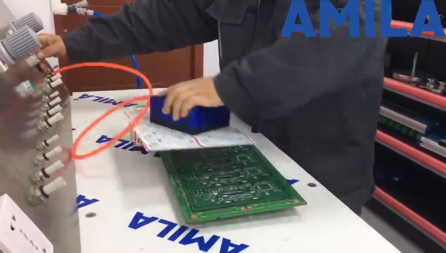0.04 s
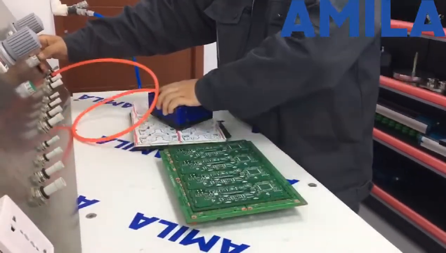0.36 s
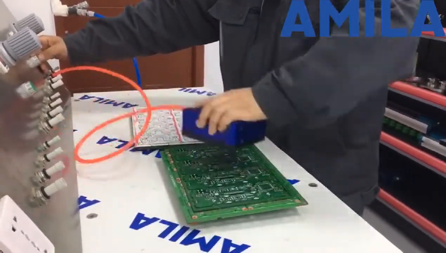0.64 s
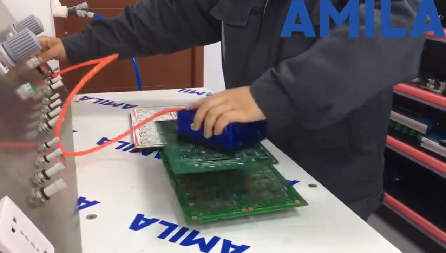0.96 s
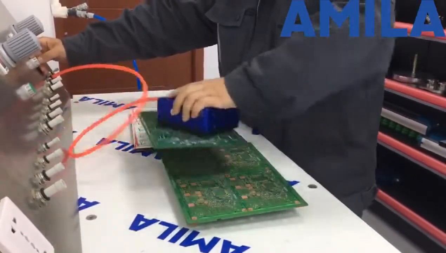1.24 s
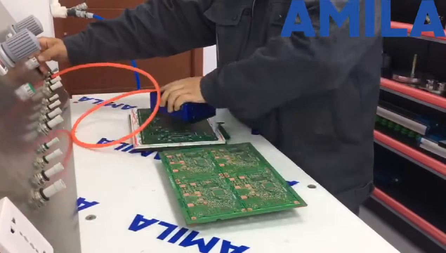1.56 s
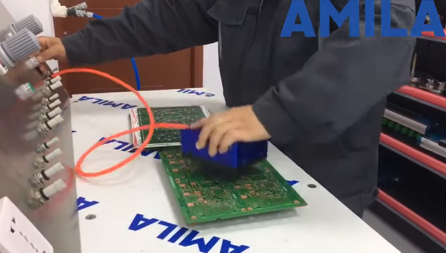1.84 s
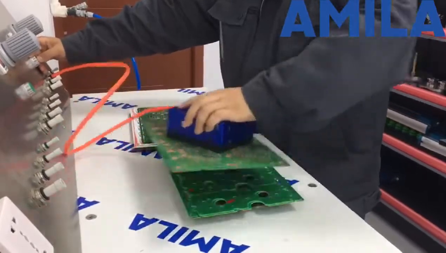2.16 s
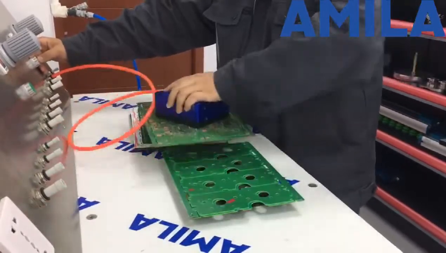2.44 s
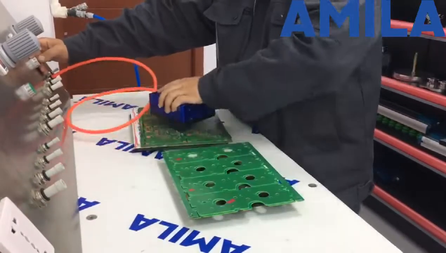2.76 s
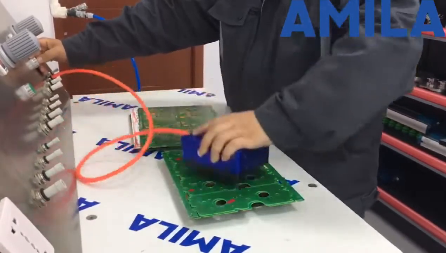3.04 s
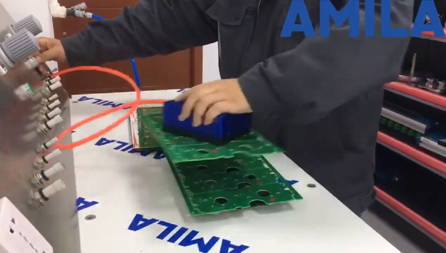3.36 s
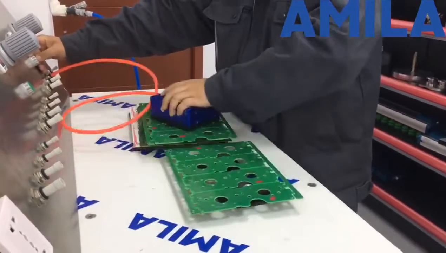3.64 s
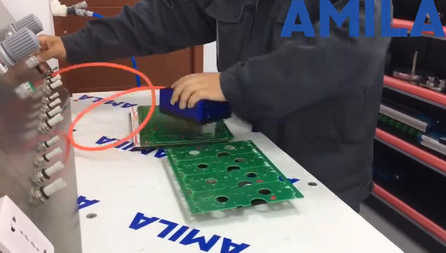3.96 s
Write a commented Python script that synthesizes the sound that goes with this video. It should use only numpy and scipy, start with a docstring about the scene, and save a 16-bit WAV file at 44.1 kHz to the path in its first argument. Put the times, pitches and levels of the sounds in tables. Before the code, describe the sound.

A suction gripper hisses brightly and close from the start, its tone shifting as it moves. The valve knocks shut and the hiss cuts out at about 0.4, 1.5, 2.7 and 3.8 seconds, each time followed by a circuit board's light tick. Within 0.2 seconds the hiss returns with a thump and puff. Soft landing bumps come near 0.8, 1.9 and 3.1 seconds. Workshop machinery drones faintly underneath.

```python
"""A bright hiss of air, close by at a workshop bench: a hand-held suction gripper is already
carrying a circuit board from one stack to another. The valve knocks shut, the hiss dies away
and the board drops with a tick. The valve knocks open with a puff, the jet hisses again, and
the gripper lands softly on the next board. The nozzle's resonance swells alike in every carry.
The bench is centred in the stereo microphone, with a low machine drone behind it."""
import sys
import numpy as np
from scipy import signal
from scipy.fft import rfft, irfft
from scipy.io import wavfile
from scipy.ndimage import uniform_filter1d

SR = 44100
rng = np.random.default_rng(int(sys.argv[2]) if len(sys.argv) > 2 else 0)


def store_wav(level_fs):
    """Save 16-bit WAV to argv[1]."""
    pcm = np.round(np.clip(np.atleast_2d(level_fs), -1, 1) * 32767)
    wavfile.write(sys.argv[1], SR, pcm.T.astype(np.int16))


N = 176400

# the valve's timing, one row per board carried: opens_s, shuts_s
CARRIES = [(-.62, .3630), (.5443, 1.5355), (1.7054, 2.6973), (2.8552, 3.8036), (3.9566, 4.95)]
LEAK_LEAD_S = .0098  # air leaks this long before the valve opens


def air_jet():
    """Turbulent air hisses through the nozzle, coloured by the gripper's motion, gated by the valve."""
    # the hiss at rest: frequency_hz, level_db
    colour = [(100, -38), (500, -10.5), (950, -9), (1400, -1.5), (2200, -2), (3500, -0.5), (5200, 0.96),
              (8200, -0.33), (9800, -5), (11400, -4), (13000, -6.5), (14300, -5), (15800, -2)]
    # drift of the whole hiss: time_s, level_db
    drift = [(0, -2.2), (.2, .7), (.34, -.5), (.58, 0), (.7, -1.3), (.82, 0.5), (.9, -0.6), (1.05, 0),
             (1.22, -1.5), (1.42, .5), (1.72, -0.5), (1.86, 0.6), (2.15, 1.14), (2.65, 1), (2.9, -0.5),
             (3.1, -0.3), (3.4, -2), (3.7, 1.1), (4, -0.5)]
    # the nozzle's breathy resonance: centre_hz, half_width_hz
    nozzle = (7130, 810)
    # its strength over each carry: share_of_carry, lift_db
    nozzle_lift = [(0, 4.9), (.1, 4.8), (.33, 1.5), (.45, 8.4), (.7, 9.1), (1, 3.4)]
    # a hump wandering through the lower hiss as the gripper moves: time_s, centre_hz, lift_db
    whoosh = [(0, 4500, 0), (.17, 5300, 2), (.3, 2700, 3), (.6, 2400, 0), (.7, 3200, -1.5),
              (.85, 2900, -1.5), (1.1, 2800, -4), (1.3, 4400, 1.5), (1.42, 5700, 3.5), (1.5, 3000, 1.5),
              (1.92, 3500, -2), (2.1, 4200, 3.5), (2.42, 4200, 4.5), (2.65, 2900, 7), (2.88, 4300, 1),
              (3.1, 2400, 0), (3.3, 2500, -3.5), (3.44, 4600, 3), (3.62, 2900, 3.5), (3.74, 4900, -3.5),
              (4, 4500, 0)]
    # a bright band that sinks and climbs again in each carry: time_s, centre_hz, lift_db
    sizzle = [(0, 13400, 8), (.15, 14500, 10), (.25, 14000, 1), (.36, 12000, -1), (.56, 14600, 9),
              (.63, 12900, 9), (.7, 11400, 6), (.88, 11200, 9), (.94, 11400, 4), (1.03, 11300, 12),
              (1.18, 11300, 8), (1.27, 12700, 11), (1.38, 15100, 7), (1.48, 12000, -6), (1.72, 14600, 11),
              (1.79, 13500, 9), (1.85, 11700, 3), (2.02, 11300, 9), (2.15, 11800, -1), (2.26, 11500, 10),
              (2.36, 13200, 4), (2.45, 14800, 6), (2.54, 12400, -9), (2.72, 12000, -5), (2.87, 14600, 6),
              (2.95, 13800, 9), (3.02, 11600, 5), (3.19, 11500, 12.5), (3.28, 10900, 5.5),
              (3.37, 11500, 13), (3.5, 12200, 5), (3.58, 15100, 5), (3.66, 13000, -5), (3.74, 15000, 7),
              (3.84, 13000, -3), (3.98, 14700, 4)]
    size, hop = 2048, 256
    t = np.arange(N // hop + 5) * hop / SR
    hz = np.fft.rfftfreq(size, 1 / SR)
    shape = (len(t), len(hz))
    progress = np.zeros(len(t))
    for opens, shuts in CARRIES:
        progress = np.where(t > opens - LEAK_LEAD_S, (t - opens) / (shuts - opens), progress)
    rest_db = spectrum(colour, hz)
    db = rest_db + curve(drift, t)[:, None]
    db += np.outer(curve(nozzle_lift, progress), bell(hz, *nozzle))
    for path, half_width_hz in ((whoosh, 1250), (sizzle, 1500)):
        times, centre, lift = np.transpose(path)
        band = bell(hz, np.interp(t, times, centre)[:, None], half_width_hz)
        db += np.interp(t, times, lift)[:, None] * band
    db += 2.5 * patches(shape, size=(16, 3))  # fine grain
    db += 1.5 * np.sqrt(hz / nozzle[0]) * patches(shape, size=(8, 18))  # the treble flickers
    db += .65 * patches((len(t), 1), size=(3, 1))  # the level flutters
    turbulence = rng.standard_normal(shape) + 1j * rng.standard_normal(shape)
    spectra = np.array([(turbulence * amp(rest_db)).T, (turbulence * amp(db)).T])
    resting, hiss = signal.istft(spectra, nperseg=size, noverlap=size - hop)[1][:, :N]
    return amp(-28.5) * airflow() * hiss / resting.std()


def airflow(rise_s=.0044, lag_s=.0045, fall_db_per_s=200):
    """The jet's envelope: flow builds as the valve opens and dies away just after it shuts."""
    t = np.arange(N) / SR
    flow = np.zeros(N)
    for opens, shuts in CARRIES:
        rise = 1 - np.exp(-np.maximum(t - opens, 0) / rise_s)
        fall = amp(-fall_db_per_s * np.maximum(t - shuts - lag_s, 0))
        flow += rise * fall
    return flow


def thump(stroke, room, rise_s=.002, bounce_s=.0042, swell_cycles=.588):
    """The plunger strikes and bounces once; bench and room ring. Stroke 0 opens, 1 shuts."""
    # the plunger's strike: pitch_hz, opening_db, shutting_db, t60_s
    plunger = (460, .5, -3.8, .0145)
    # modes of the valve body and the bench under it: pitch_hz, opening_db, shutting_db, t60_s
    bench_modes = [(82.5, -51, -48, 0.38), (132, -31.5, -23.5, 0.28), (170, -19.5, -25, 0.16),
                   (198, -32, -33, 0.12), (252, -36, -38.5, 0.24), (295, -31, -38, 0.12),
                   (324.7, -25.5, -26.5, 0.16), (424.5, -19.5, -23, .14), (476, -24, -25, 0.11),
                   (549, -24.5, -28.5, .2), (626.3, -18, -23, 0.082), (712, -28.5, -33.5, 0.16),
                   (772, -32, -36, 0.068)]
    t = np.arange(SR // 2) / SR
    hz, *levels, t60 = plunger
    envelope = (1 - bell(t, 0, rise_s)) * decay(t60)[:len(t)]
    knock = amp(levels[stroke]) * envelope * np.sin(2 * np.pi * hz * t)
    out = knock.copy()
    add(out, bounce_s, amp(4.2) * knock)
    for k, (hz, *levels, t60) in enumerate(bench_modes):
        envelope = (1 - bell(t * hz, 0, swell_cycles)) * decay(t60)[:len(t)]
        ring = amp(levels[stroke]) * envelope * np.sin(2 * np.pi * hz * t)
        out -= (-1) ** k * ring  # neighbouring modes start in opposite directions
    return out + amp(-12) * signal.fftconvolve(out, room)[:len(t)]


def valve():
    """The valve opens with a brief leak, a thump and a puff of air, and shuts with a softer thump."""
    # the first puff of air: frequency_hz, level_db
    puff = [(40, -21), (300, 5), (900, -4), (1400, -5), (2300, -2), (3400, -16), (5000, -3.5),
            (8000, -25.5), (16000, -9)]
    # the thin leak just ahead of it: frequency_hz, level_db
    leak = [(300, -10), (1500, -1), (5000, 0), (10000, -1), (15800, 3)]
    fade_in = 1 - bell(np.arange(N) / SR, 0, .017)
    room = rng.standard_normal(N) * decay(t60_s=.3) * fade_in
    room /= np.linalg.norm(room)
    opening, shutting = thump(0, room), thump(1, room)
    out = np.zeros(N)
    for opens, shuts in CARRIES:
        add(out, shuts, shutting)
        if opens > 0:
            add(out, opens, opening)
            add(out, opens, amp(-24) * noise(puff) * decay(t60_s=.18))
            add(out, opens - LEAK_LEAD_S, amp(-36) * noise(leak) * decay(t60_s=.1))
    return out


def board_impacts():
    """Short noise bursts: a released board ticks on the stack, the gripper lands on the next."""
    # boards dropping: start_s, level_db
    drops = [(.409, -26.5), (1.588, -26), (2.745, -33), (3.847, -25)]
    # their bright tick: frequency_hz, level_db
    tick = [(500, -15), (3000, -2), (7000, -7), (11000, 2), (15800, -2)]
    # the gripper touching down: start_s, level_db
    landings = [(.797, -31.5), (1.932, -32), (3.118, -35)]
    # its soft bump: frequency_hz, level_db
    bump = [(50, -27), (170, -2), (500, -2), (900, -10), (4000, -11), (16000, -40)]
    out = np.zeros(N)
    for events, colour, t60_s in ((drops, tick, .05), (landings, bump, .11)):
        for start_s, level_db in events:
            add(out, start_s, amp(level_db) * noise(colour) * decay(t60_s))
    return out


def machine_drone():
    """Workshop machinery in the background: steady low noise with a few resonances."""
    # the broad rumble: frequency_hz, level_db
    rumble = [(20, -31), (45, -22), (65, -14), (85, -5), (105, -5.5), (190, 2), (300, -1.5), (450, -2.5),
              (650, -5), (1000, -13.5), (2500, -22), (7000, -20), (15800, -36)]
    # resonances in it: centre_hz, half_width_hz, lift_db
    resonances = [(79, 5, 3.3), (120, 17.6, 9.3), (171, 3.1, 6.3), (242, 9.2, 3.7), (418, 16, 8.8)]
    return amp(-44) * noise(rumble, resonances)


def amp(db):
    """Decibels to gain."""
    return 10 ** (np.asarray(db) / 20)


def unit(x):
    """Scales to rms 1."""
    return x / np.sqrt(np.mean(x ** 2) + 1e-20)


def curve(points, at):
    """Straight lines through the points."""
    return np.interp(at, *np.transpose(points))


def spectrum(points, hz):
    """Straight lines through the points on a log-frequency axis."""
    corner_hz, db = np.transpose(points)
    return np.interp(np.log(hz + 1), np.log(corner_hz), db)


def bell(x, centre, half_width):
    """A smooth hump of height 1."""
    return np.exp(-((x - centre) / half_width) ** 2)


def add(mix, start_s, sound):
    """Mixes a sound in at start_s."""
    part = mix[max(round(start_s * SR), 0):][:len(sound)]
    part += sound[:len(part)]


def noise(colour, peaks=()):
    """Steady noise of rms 1, shaped by a spectrum and resonances."""
    hz = np.fft.rfftfreq(N, 1 / SR)
    db = spectrum(colour, hz) + sum(lift * bell(hz, centre, width) for centre, width, lift in peaks)
    return unit(irfft(rfft(rng.standard_normal(N)) * amp(db), N))


def decay(t60_s):
    """An envelope that falls 60 dB in t60_s."""
    return np.exp(-np.log(1000) * np.arange(N) / SR / t60_s)


def patches(shape, size):
    """A smooth random field of rms 1 over (frames, bins)."""
    field = rng.standard_normal(shape)
    for axis in (0, 1, 0, 1):
        field = uniform_filter1d(field, size[axis], axis)
    return unit(field)


def scene():
    """At the microphone all is central; only the treble of jet and boards spreads to the sides."""
    # stereo width: frequency_hz, side_gain_db
    width = [(20, -65), (3000, -86), (3900, -23), (6000, -12), (7500, -29), (10000, -6), (15800, -13)]
    mid = air_jet() + valve() + board_impacts() + machine_drone()
    side_gain = amp(spectrum(width, np.fft.rfftfreq(N, 1 / SR)))
    side = irfft(rfft(air_jet() + board_impacts()) * side_gain, N)  # fresh noise, unlike the mid
    return np.array([mid + side, mid - side])


def record(dry, cutoff_hz=15950):
    """The recorder's band limit cuts off the highest treble."""
    taps = signal.firwin(511, cutoff_hz, window=("kaiser", 8), fs=SR)
    return signal.oaconvolve(dry, taps[None], "same")


dry = scene()
out = record(dry)
store_wav(out)
```